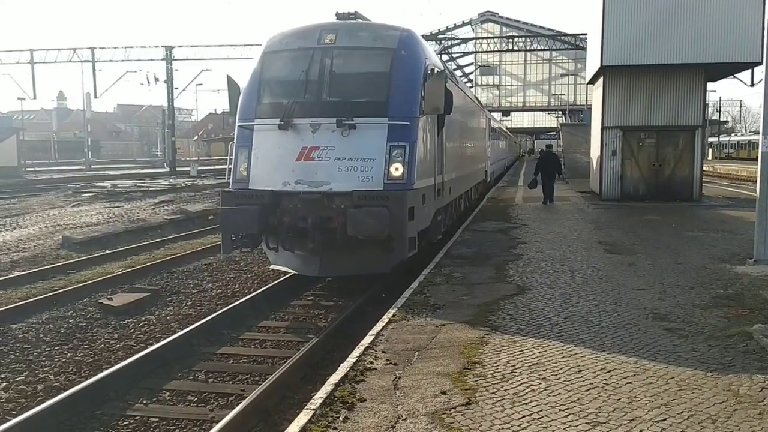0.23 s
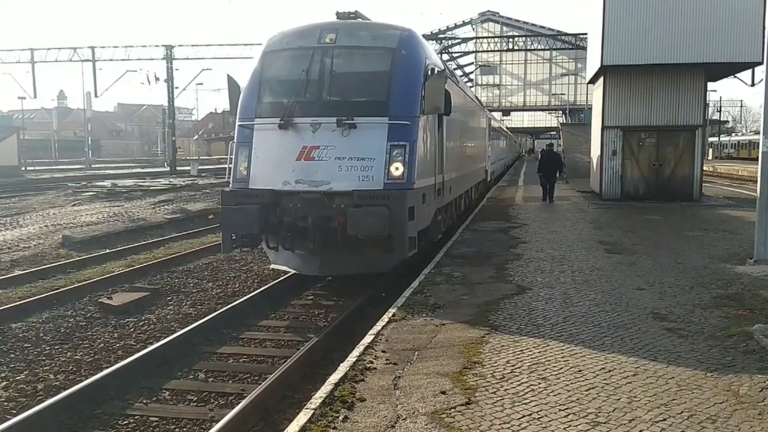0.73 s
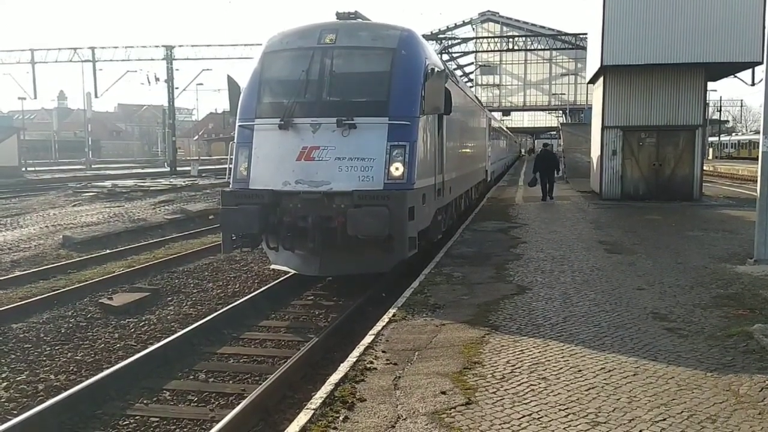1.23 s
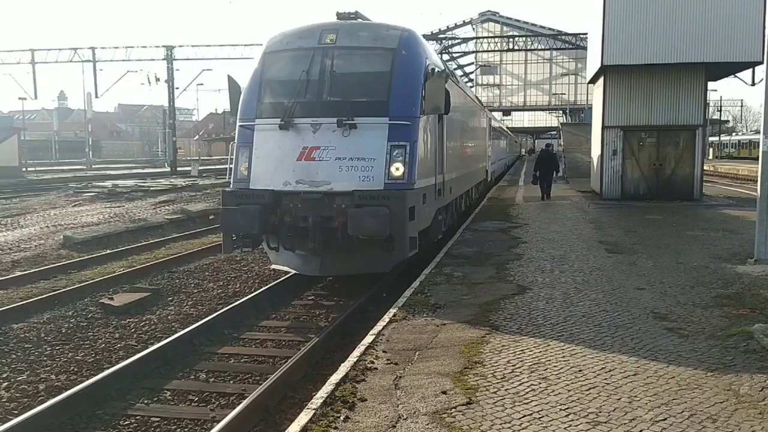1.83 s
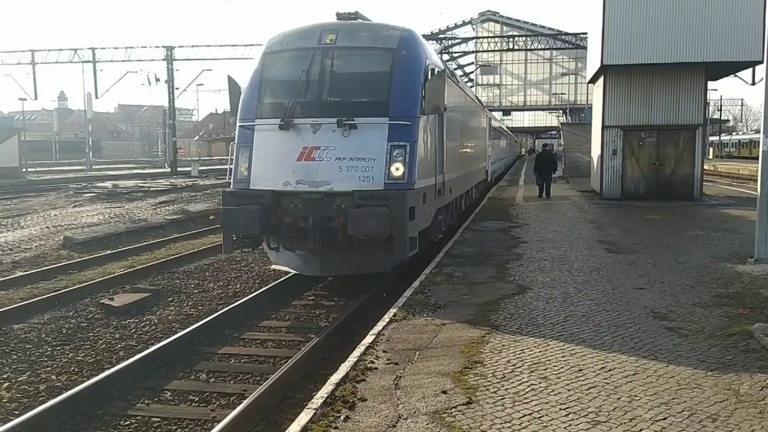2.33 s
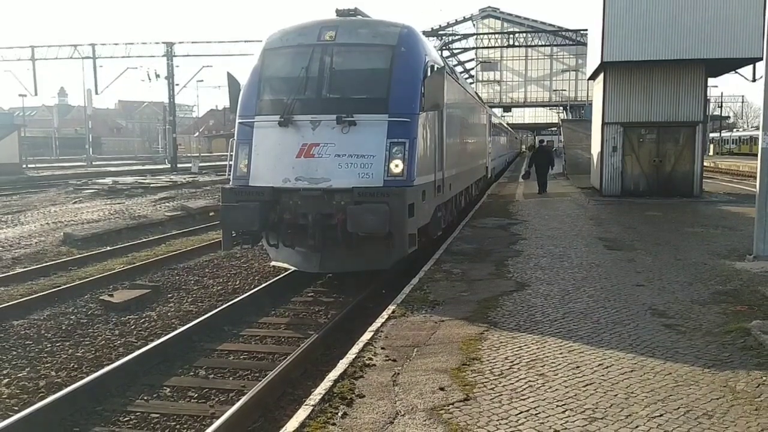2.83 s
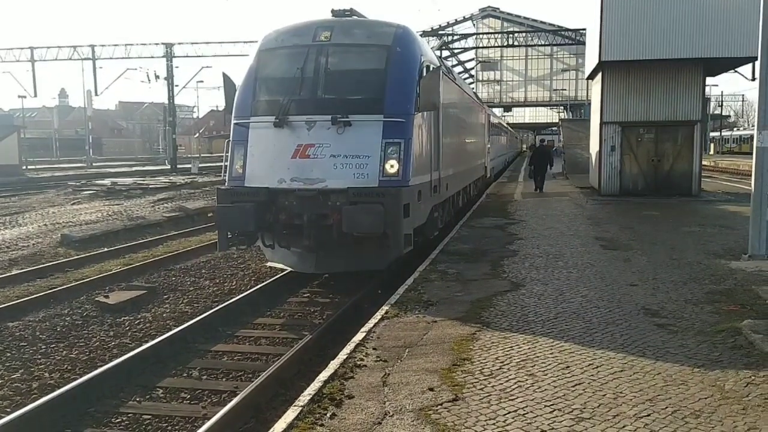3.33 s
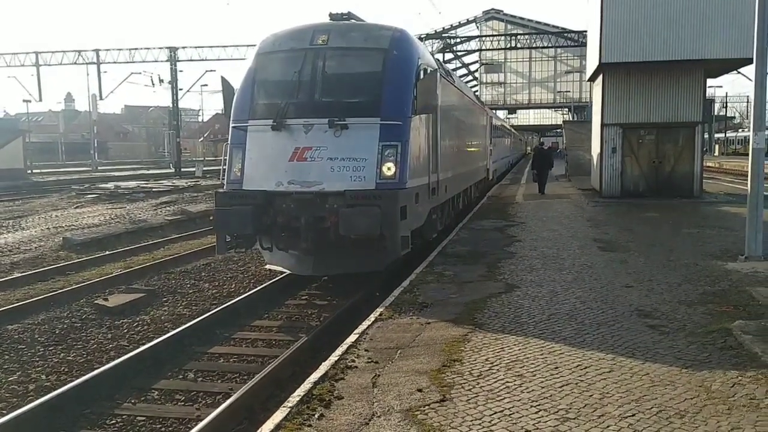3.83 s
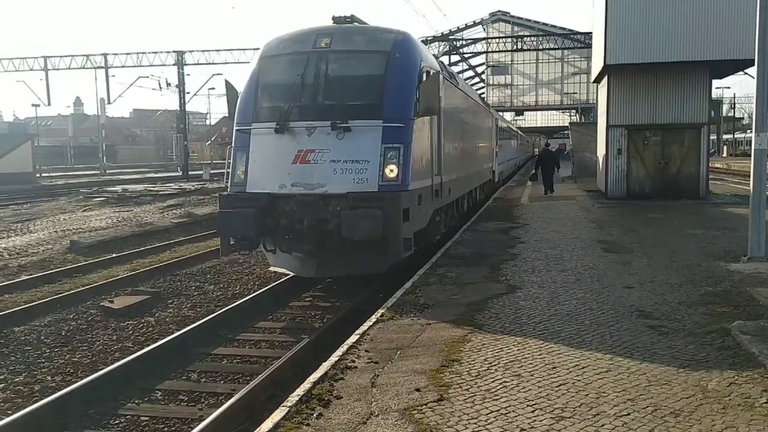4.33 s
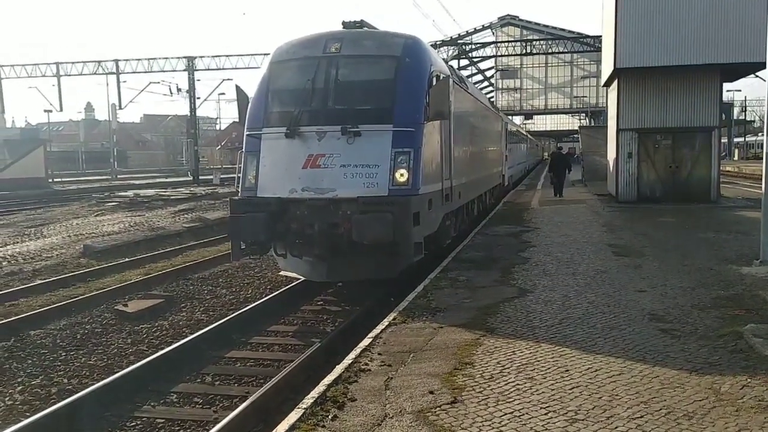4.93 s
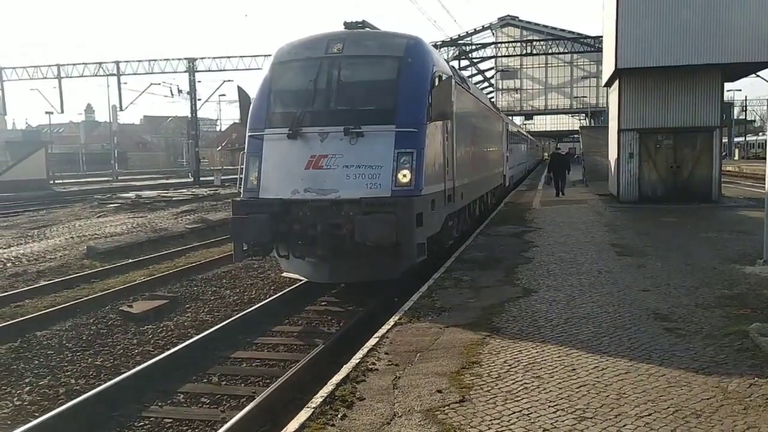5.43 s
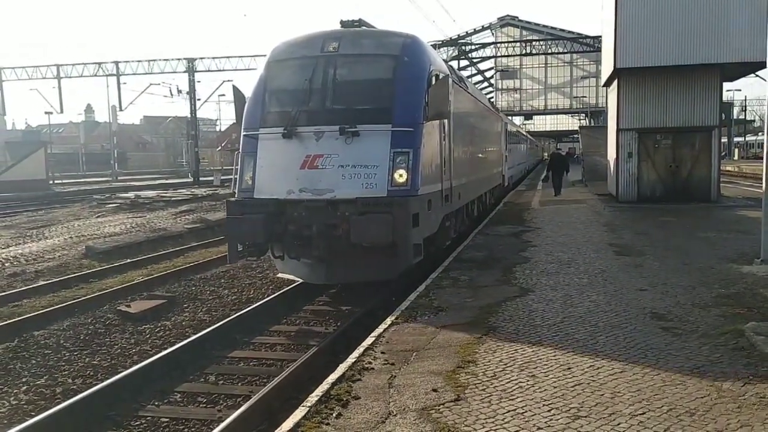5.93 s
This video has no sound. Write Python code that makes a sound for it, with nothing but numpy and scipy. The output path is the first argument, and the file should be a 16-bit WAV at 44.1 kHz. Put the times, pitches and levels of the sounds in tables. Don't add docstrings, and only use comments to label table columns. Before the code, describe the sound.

Steady mid-high fan whine and low machinery rumble from a standing train, faint brake scrapes, then one tiny squeak and a sharp puff of compressed air.

```python
import sys
import numpy as np
from scipy import signal
from scipy.fft import rfft, irfft, next_fast_len
from scipy.io import wavfile
from scipy.ndimage import uniform_filter1d

SR = 44100
rng = np.random.default_rng(int(sys.argv[2]) if len(sys.argv) > 2 else 0)


def master(y):
    cut = np.clip(np.atleast_2d(y).T, -1, 1)
    pcm = np.round(cut * 32767)
    wavfile.write(sys.argv[1], SR, pcm.astype(np.int16))


def makeup_ratio(level_db):
    decades = np.asarray(level_db, float) / 20
    return 10 ** decades


N = 272538
M = next_fast_len(N)
T, F = np.arange(N) / SR, np.fft.rfftfreq(M, 1 / SR)
CREEP_FROM_S = 3.4


def along(table, axis):
    first, *columns = np.transpose(table)
    return [np.interp(axis, first, c) for c in columns]


def over_hz(table):
    table = np.array(table, float)
    return along(np.c_[np.log(table[:, 0]), table[:, 1:]], np.log(F + 1))


def walk(rate):
    hold = int(SR / rate)
    steps = np.repeat(rng.standard_normal(N // hold + 1), hold)
    wander = uniform_filter1d(uniform_filter1d(steps, hold), hold)[:N]
    return wander / wander.std()


def tone(phase, db, pan_db, lead):
    side = np.array([[.5], [-.5]])
    return np.sqrt(2) * makeup_ratio(db + side * pan_db) * np.sin(phase + side * lead)


def pull():
    rise_s = 1.5
    return np.clip((T - CREEP_FROM_S) / rise_s, 0, 1)


# (time [s], level [dB], left minus right [dB])
BLADE_TONE = [(0.0, -26.5, 1), (.2, -25, .3), (.4, -26.5, .1), (.95, -27.5, -2), (1.4, -25, 0.1),
              (1.58, -27, 0.1), (1.86, -24, 1.5), (2.6, -26, 1.5), (3.0, -24, 2), (3.4, -26, 6),
              (3.68, -22.7, .6), (3.88, -27, 1.5), (4.0, -24, -1.5), (4.42, -25.5, -2.5), (4.85, -29, -8.5),
              (5.18, -27.5, -1), (5.7, -30.5, -5), (6.18, -31, 6.5)]
# (shaft order, level [dB], left minus right [dB], left lead [rad], start phase [rad])
SHAFT_ORDERS = [
    (9, -49.5, -2, -.6, 0),
    (10, -58, 0, -.5, 0),
    (11, -49, 0, -.5, 2.9),
    (13, -45, 2, -.4, 0),
    (24, -56.5, 4, 1.3, 0),
    (36, -68, 4, -.8, 0),
    (48, -63, 6, -1.1, 0),
    (1, -50, 3.7, -.1, 0),
]
SHAFT_ORDER_TRIM = [0.1, 0.1, 0.1, 0.11, 0.1, 0.1, 0.1, 0.1]


def fan():
    shaft_hz = 58.965
    turn = 2 * np.pi * shaft_hz * T + 0.032 * walk(1.49)
    db, pan_db = along(BLADE_TONE, T)
    lead_at_rest_rad, lead_rad_per_s, lead_waver_rad = -.95, .45, .12
    creep_s = np.clip(T - CREEP_FROM_S, 0, None)
    lead = lead_at_rest_rad + lead_rad_per_s * creep_s + lead_waver_rad * walk(3)
    blade_phase = 12 * turn + 0.08 * walk(12)
    blade_db = db + .6 + 0.5 * walk(14) + .5 * walk(7)
    out = tone(blade_phase, blade_db, pan_db + .6 * walk(10), lead)

    fade_s, fade_width_s, fade_db, pull_db = 2.4, .6, -6, 5.8
    ninth_db = fade_db * np.exp(-((T - fade_s) / fade_width_s) ** 2) + pull_db * pull()
    for (order, db, pan_db, lead, start), trim_db in zip(SHAFT_ORDERS, SHAFT_ORDER_TRIM):
        swell_db = ninth_db if order == 9 else 0
        phase = order * turn + start + .2 * walk(6)
        order_db = db + trim_db + swell_db + .2 + 1.1 * walk(6)
        out += tone(phase, order_db, pan_db, lead)
    return out


# (start [s], swell [dB], hold [s])
RIGGING_SCRAPES = [(.14, 1.6, .08), (.5, 1.2, .15), (1.81, 4.5, .08), (2.8, 1.6, .14), (2.96, 2.4, .1),
                   (3.15, 4.4, .2), (3.58, 4.5, .06), (4.6, 2.4, .2), (4.93, 3, .08), (5.12, 2.6, .05),
                   (5.93, 1.4, .1)]


def scrapes():
    attack_s, release_s = .03, .09
    swell_db = 0
    for start, db, hold in RIGGING_SCRAPES:
        rise = np.clip((T - start) / attack_s, 0, 1)
        swell_db = swell_db + db * rise * np.exp(-np.clip(T - start - hold, 0, None) / release_s)
    return swell_db


# (frequency [Hz], level [dB per Hz], left minus right [dB], likeness of sides [0-1], left lead [rad])
NOISE_SPECTRUM = [(22, -58, 5, 0.77, -0.28), (42, -54.5, 3.3, 0.92, -0.1), (62, -56, 3.7, 0.93, -0.1),
                  (85, -58.5, 3, 0.93, -0.2), (114, -64.5, 6.5, 0.88, -0.2), (150, -58.5, 5, 0.98, -0.2),
                  (189, -55, 4.5, 0.96, -0.15), (221, -60.5, 5.3, 0.94, -0.44), (309, -61.5, 6, 0.95, -0.69),
                  (425, -66.5, 2.1, 0.89, -1.12), (570, -66.5, -0.7, 0.73, -0.7), (700, -64.5, -1, 0.8, -0.3),
                  (815, -59.0, 7.5, 0.89, -0.26), (881, -58.5, 4.5, 0.79, -0.38),
                  (958, -65, 13, 0.38, -2.1), (1058, -68.5, 4.5, 0.71, -3), (1390, -68.5, 3.5, 0.44, -4.5),
             (1900, -72.5, 4, 0.27, -6), (2150, -71, 3, 0.65, -7.5), (2370, -72.5, 3.5, 0.4, -7),
             (2860, -73.5, 5.5, 0.19, -7.5), (3190, -77, 4, 0.13, -9.5), (4240, -80.5, 0, 0.17, -8),
             (4980, -84.5, -1.5, 0.06, -9),
                  (6000, -85.5, -0.5, 0.06, -5), (6960, -84, -0.4, 0.52, -7.5), (7900, -81.5, -2, 0.76, -7.5),
              (8900, -79.5, -4.5, 0.83, -7), (9520, -82, -6.5, 0.88, -7), (10040, -88, -8, 0.81, -6),
              (10660, -92, -5, 0.65, -6), (11650, -98.5, -4, 0.69, -6), (12700, -102.4, -0.3, 0.7, -4.5),
              (13400, -109.0, 0.9, 0.51, -5)]


def noise_spectra():
    db, pan_db, likeness, lead = over_hz(NOISE_SPECTRUM)
    likeness = np.clip(likeness, 0, 1)
    shared, left, right = rfft(rng.standard_normal((3, M)))
    pair = []
    for side, own in ((1, left), (-1, right)):
        common = np.sqrt(likeness) * shared * np.exp(.5j * side * lead)
        pair.append(common + np.sqrt(1 - likeness) * own)
    left_share = 1 / (1 + makeup_ratio(-2 * pan_db))
    pair = np.array(pair) * makeup_ratio(db) * np.sqrt(SR * np.array([left_share, 1 - left_share]))
    return pair / (1 + (14 / (F + 1)) ** 4) / (1 + (F / 13400) ** 40)


LAYER_HZ = [60, 200, 850, 1800, 4500, 8800, 12500]
# (share of a scrape's swell [ratio], rise under load [dB], slow wander [dB])
LAYER_MOTION = [
    (.01, .6, .3),
    (.01, .3, .4),
    (.01, 2.2, .2),
    (.33, .01, .4),
    (1.15, -.2, .2),
    (.75, .1, .2),
    (.8, 4, .6),
]


def airflow():
    pair = noise_spectra()
    controls = np.array([share * scrapes() + load_db * pull() + wander_db * walk(5)
                         for share, load_db, wander_db in LAYER_MOTION])
    controls -= np.median(controls, axis=1)[:, None]
    centres = np.arange(5, 14.1, .5)
    out, near = 0, walk(3.2)
    for k, octave in enumerate(centres):
        window = np.interp(np.log2(F + 1), centres, np.arange(len(centres)) == k)
        place = np.interp(octave, np.log2(LAYER_HZ), np.arange(len(LAYER_HZ)))
        low = min(int(place), len(LAYER_HZ) - 2)
        level_db = (low + 1 - place) * controls[low] + (place - low) * controls[low + 1]
        near = 0.81 * near + 0.94 * walk(3)
        band = irfft(pair * window, M)[:, :N]
        out = out + band * makeup_ratio(.85 * level_db + .2 * near + .4 * walk(12))
    return out


# (frequency [Hz], width [Hz], level [dB])
SQUEAK_MODES = [
    (8580, 40, -41.5),
    (8980, 40, -52),
    (9720, 40, -53),
    (8000, 40, -59),
]
SQUEAK_TIMES = [3.55, 3.6, 3.69]


def squeak():
    ring = sum(makeup_ratio(db) * np.sqrt(width) / (1 + (2 * (F - hz) / width) ** 2) for hz, width, db in SQUEAK_MODES)
    sound = irfft(rfft(rng.standard_normal(M)) * ring, M)[:N] * 3.3
    swell = np.interp(T, SQUEAK_TIMES, [0, 1, 0])
    return sound * swell * makeup_ratio(np.array([[-1.5], [1.5]]))


# (time [s], peak level [dB], decay to -60 dB [s])
VALVE_SPITS = [
    (5.137, -28.5, 0.08),
    (5.149, -40, 0.04),
    (5.17, -44, .08),
    (5.18, -42, .06),
    (5.19, -45, .1),
]
# (frequency [Hz], level [dB])
VALVE_COLOUR = [(1500, -10.5), (2500, -5), (4000, -11), (6000, -7.5), (7500, -6), (9000, 1), (10500, -12.5),
                (12500, -22), (14000, -31), (14600, -70)]


def valve():
    puff = irfft(rfft(rng.standard_normal((2, M))) * makeup_ratio(over_hz(VALVE_COLOUR)[0]), M)[:, :N]
    puff = (puff + 0.32 * puff[::-1]) / puff.std()
    shape = 0
    for start, db, t60 in VALVE_SPITS:
        decay = makeup_ratio(db - 60 * np.clip(T - start, 0, 1) / t60)
        shape = shape + decay * np.clip((T - start) / .002, 0, 1)
    lowpass = signal.butter(10, 14400, fs=SR, output="sos")
    return signal.sosfilt(lowpass, puff * shape)


def lower_sideband():
    sideband_hz, level_db, waver_rad = 696, -49, 1.5
    phase = 2 * np.pi * sideband_hz * T + waver_rad * walk(8)
    return tone(phase, level_db + 2.5 * walk(6), .6, -.7)


def scene():
    return fan() + airflow() + valve() + squeak() + lower_sideband()


# (frequency [Hz], step over band rms [dB],
# chance of one signal for both sides [0-1], chance of a side upside down [0-1])
PHONE_ROUNDING = [(3000, -6, 0, 0), (4300, 3, 0, 0), (4800, 7.5, 0, 0), (6000, 7.5, 0, 0),
                  (6300, 5, .75, .22), (7200, 4, .8, .15), (8000, 2, .8, .08), (9500, 1, .9, 0),
                  (10300, 7, .8, 0), (11200, 11, .5, .1), (12300, 11.5, .35, .1), (13500, 12.5, .35, .1)]
PHONE_BANDS = [132, 144, 160, 176, 196, 216, 240, 264, 292] + list(range(320, 641, 32))
# (from [s], to [s], band [Hz])
SIDE_FLIPS = [(.11, .18, 6500), (1.22, 1.29, 6500), (3.01, 3.1, 7200), (3.17, 3.24, 6500),
              (3.19, 3.29, 7200), (3.59, 3.72, 6500), (3.76, 3.85, 7200), (4.17, 4.27, 6500),
              (4.72, 4.8, 7200), (5.0, 5.06, 7900), (6.09, 6.18, 6500)]


def phone_rounding(x, scatter_db=2.0):
    size = 941
    n, k = np.arange(2 * size), np.arange(PHONE_BANDS[0], PHONE_BANDS[-1])
    window = np.sin(np.pi * (n + .5) / 2 / size)[:, None]
    cosines = np.cos(np.pi / size * np.outer(n + .5 + size / 2, k + .5))
    basis = window * cosines * np.sqrt(2 / size)
    count = N // size + 2
    blocks = np.pad(x, ((0, 0), (size, (count + 1) * size - N - size))).reshape(2, -1, size)
    lines = np.concatenate([blocks[:, :-1], blocks[:, 1:]], axis=2) @ basis
    rounded = lines.copy()
    frame_s, line_hz = np.arange(count)[:, None] * size / SR, SR / 2 / size
    for lo, hi in zip(PHONE_BANDS, PHONE_BANDS[1:]):
        cut = slice(lo - k[0], hi - k[0])
        left, right = lines[:, :, cut]
        band = np.array([left, right, (left + right) / np.sqrt(2), (left - right) / np.sqrt(2)])
        step_db, chance, upside_down = along(PHONE_ROUNDING, (lo + hi) / 2 * line_hz)
        rms = np.sqrt(np.mean(band ** 2, axis=2, keepdims=True)) + 1e-12
        luck = uniform_filter1d(rng.standard_normal((2, count, 1)), size=2, axis=1) * np.sqrt(2)
        step = np.sqrt(rms[0] * np.median(rms[0])) * makeup_ratio(step_db + scatter_db * luck[0])
        kept = np.sign(band) * np.floor(abs(band) / step + .4) * step
        usual = rms[0, :, 0] < 2 * np.median(rms[0])
        kept *= min(2, np.sqrt(np.mean(band[:, usual] ** 2) / (np.mean(kept[:, usual] ** 2) + 1e-20)))
        joint = np.mean(luck[1] > luck[1].T, axis=1, keepdims=True) < chance
        sign = np.where(rng.random((count, 1)) < upside_down, -1, 1)
        gain = sign * makeup_ratio(1.5 * np.round(20 * np.log10(rms[1] / rms[0]) / 1.5))
        for start, end, hz in SIDE_FLIPS:
            flip = (frame_s >= start) & (frame_s <= end) & (lo * line_hz < hz < hi * line_hz)
            joint, gain = joint | flip, np.where(flip, -1, gain)
        rounded[0, :, cut] = np.where(joint, kept[0], (kept[2] + kept[3]) / np.sqrt(2))
        rounded[1, :, cut] = np.where(joint, gain * kept[0], (kept[2] - kept[3]) / np.sqrt(2))
    change = (rounded - lines) @ basis.T
    added = change[:, 1:, :size] + change[:, :-1, size:]
    return x + added.reshape(2, -1)[:, :N]


def top_cut(x):
    return signal.sosfilt(signal.butter(12, 14120, fs=SR, output="sos"), x)


def record(dry):
    mix = phone_rounding(dry)
    return top_cut(mix)


dry = scene()
out = record(dry)
master(out)
```